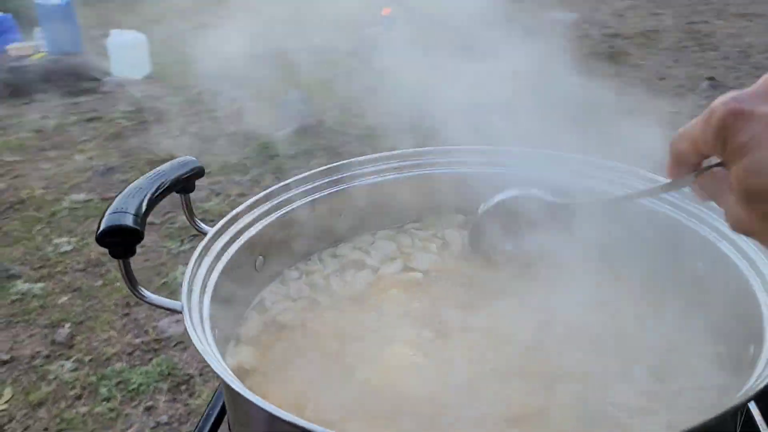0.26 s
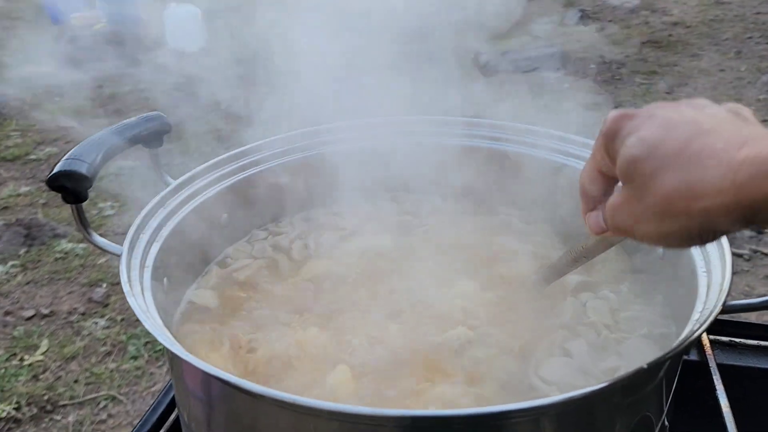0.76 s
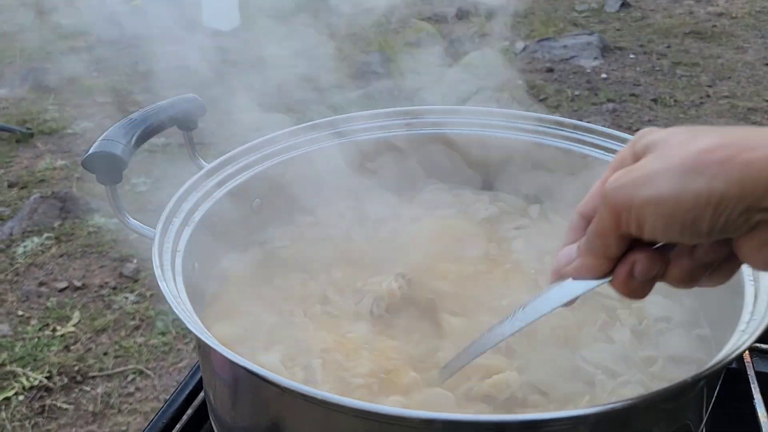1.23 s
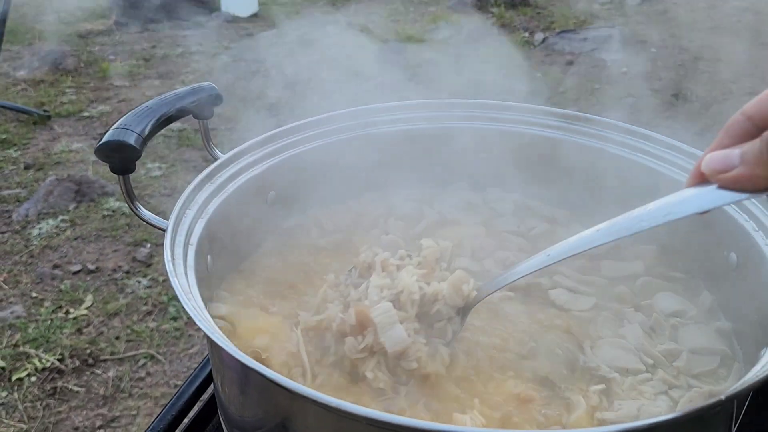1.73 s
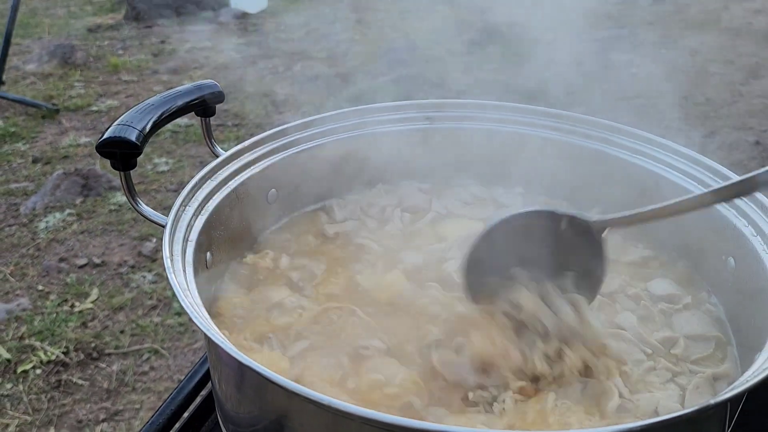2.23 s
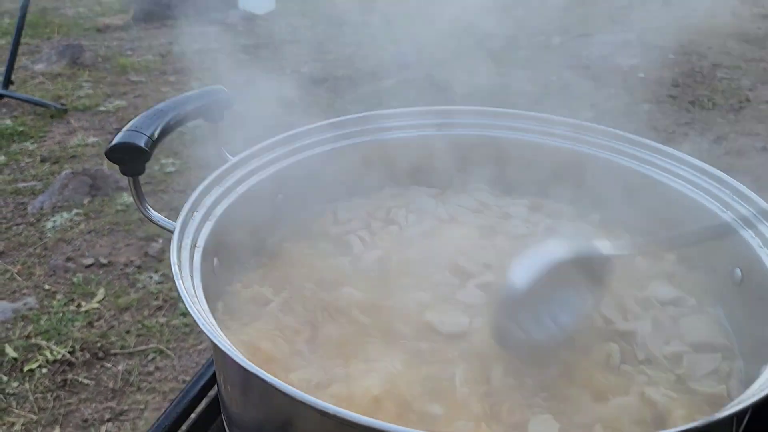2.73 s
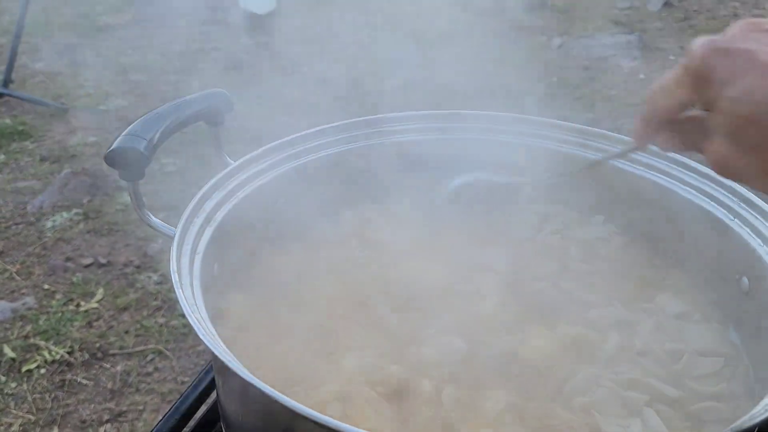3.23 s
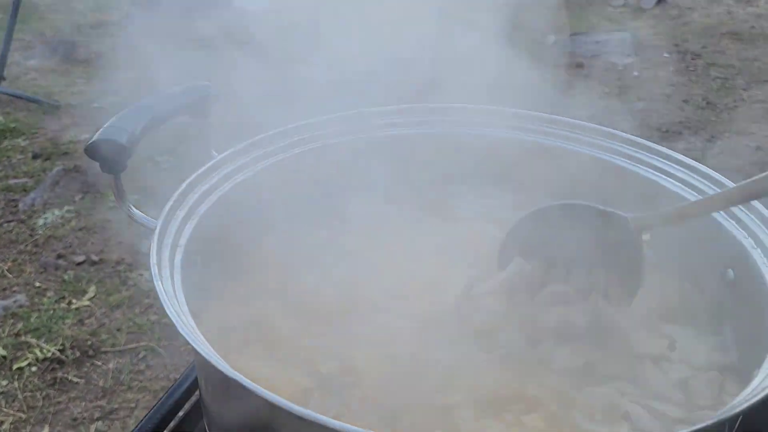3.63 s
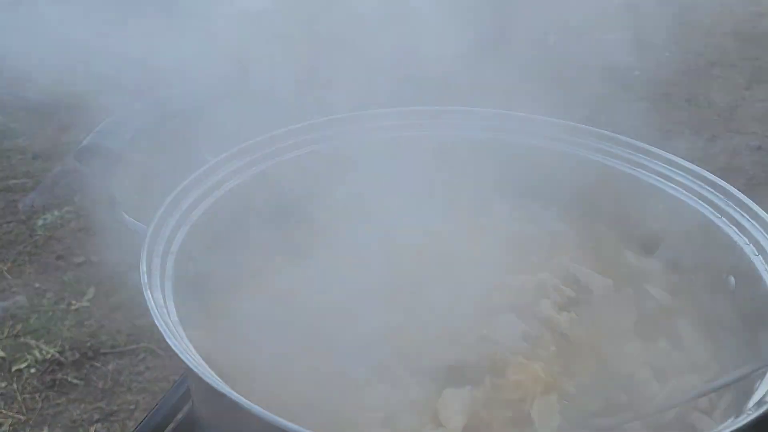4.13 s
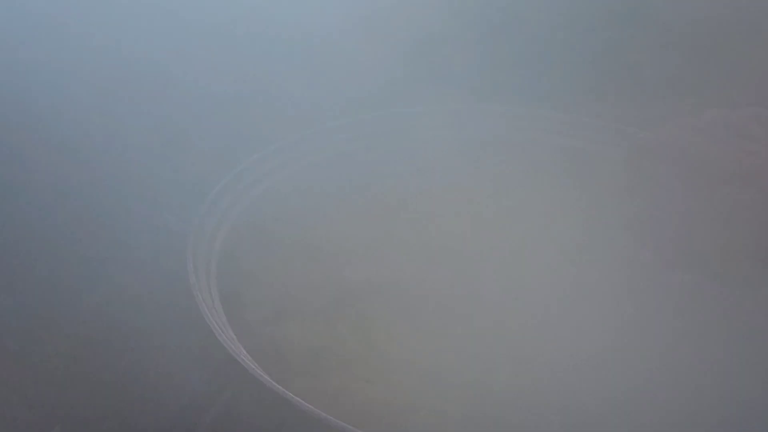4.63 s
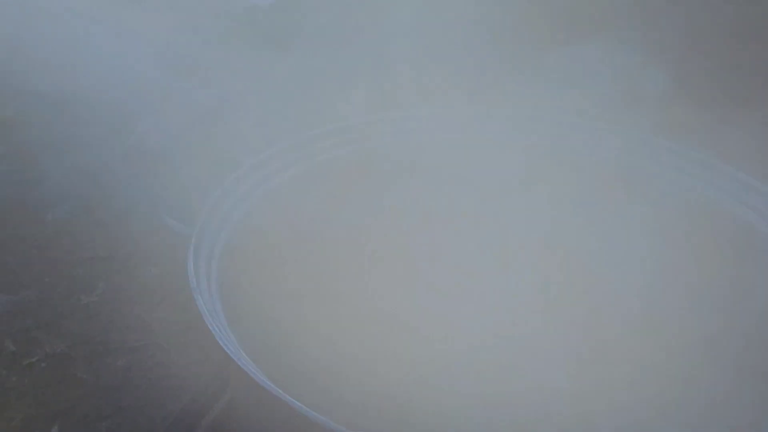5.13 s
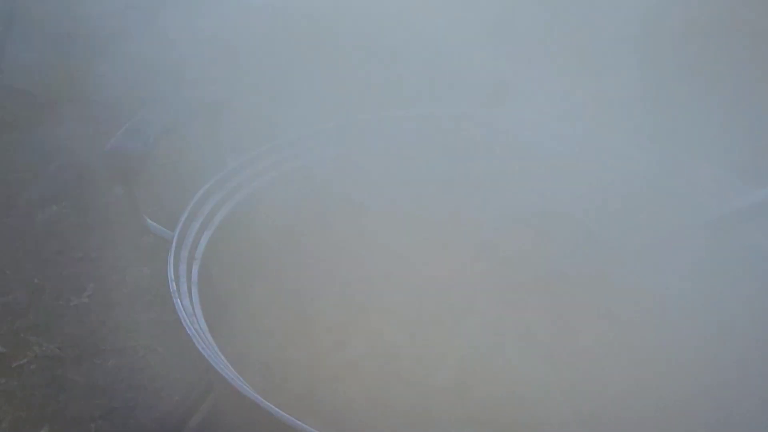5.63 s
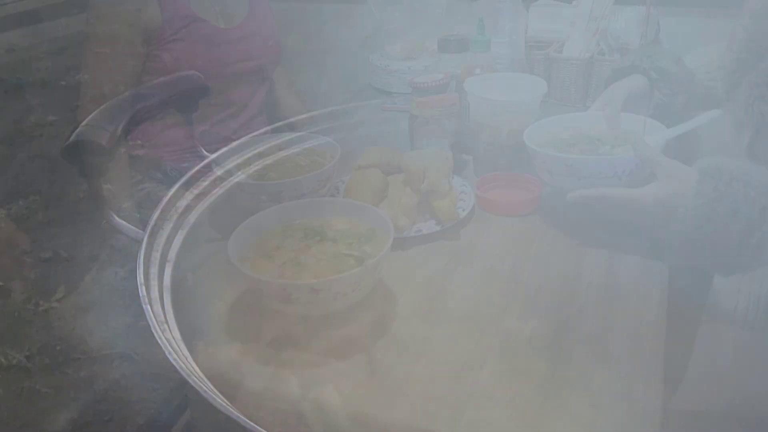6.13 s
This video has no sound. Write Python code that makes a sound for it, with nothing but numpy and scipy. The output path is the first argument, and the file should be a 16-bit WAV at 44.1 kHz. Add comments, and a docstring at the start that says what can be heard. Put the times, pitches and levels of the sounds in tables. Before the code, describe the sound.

A gas burner roars low and throbs unevenly under a gurgling, hissing pot of soup, with small wet plops and a few sharp metallic ticks.

```python
"""A gas burner roars under a big pot of soup at a campsite, close to a hand-held microphone.
Filtered noise makes the roar, its resonances and the hiss; a wavering sine makes the flame throb under the pot.
Rising, dying sines make the boil's gurgle and simmer and a ladle's plops; short puffs of noise make the spits.
A few sharp ticks, alone or close together, ring the pot. At the end the microphone turns away."""
import sys
import numpy as np
from scipy import signal
from scipy.fft import rfft, irfft, next_fast_len
from scipy.io import wavfile
from scipy.ndimage import uniform_filter1d

SR = 44100
rng = np.random.default_rng(int(sys.argv[2]) if len(sys.argv) > 2 else 0)


def wrap_up_sound(samples):
    """Save the sound to the file named by the first command line argument, as 16-bit audio."""
    columns = np.atleast_2d(samples).T
    # keep every value between -1 and 1, then stretch to whole-number steps
    tamed = np.clip(columns, -1, 1)
    steps = np.round(tamed * 32767).astype(np.int16)
    wavfile.write(sys.argv[1], SR, steps)


N = 280467  # length in samples


def undb(db):
    """Decibels to gain."""
    return 10 ** (np.asarray(db) / 20)


def unit(x):
    """Scale to rms 1."""
    return x / np.sqrt(np.mean(x ** 2))


def curve(table):
    """The level of a timed table, joined by straight lines, one value a sample."""
    start_s, level_db = np.transpose(table)
    return np.interp(np.arange(N) / SR, start_s, level_db)


def colour(x, points):
    """Filter by a spectrum of (Hz, dB) points, joined along log frequency."""
    hz, db = np.transpose(points)
    size = next_fast_len(N, True)
    f = np.maximum(np.fft.rfftfreq(size, 1 / SR), 1)
    gain = undb(np.interp(np.log(f), np.log(hz), db))
    return irfft(rfft(x, size) * gain, size)[..., :N]


def resonate(x, hz, width_hz):
    """A resonance with steep skirts, gain 1 at its centre: the same peak filter twice."""
    peak = np.concatenate(signal.iirpeak(hz, hz / width_hz / np.sqrt(2), fs=SR))
    return signal.sosfilt(np.tile(peak, (2, 1)), x)


def walk(rate_hz):
    """Slow chance: random levels, smoothed, with rms 1."""
    hold = int(SR / rate_hz)
    held = np.repeat(rng.standard_normal(N // hold + 1), hold)
    return unit(uniform_filter1d(uniform_filter1d(held, hold), hold)[:N])


def pan(x, left_minus_right_db):
    """Place a sound by its left minus right level."""
    sides_db = np.array([left_minus_right_db, -left_minus_right_db]).reshape(2, -1) / 2
    return x * undb(sides_db)


def add(out, start_s, sound):
    """Mix a short sound in at its start time."""
    i = int(start_s * SR)
    out[:, i:i + sound.shape[1]] += sound[:, :N - i]


def bubble(hz, cycles, glide):
    """A bubble rises in pitch as it surfaces, by the share glide, while it dies by 60 dB."""
    length_s = cycles / hz
    age = np.arange(int(length_s * SR)) / (length_s * SR)
    tone = np.sin(2 * np.pi * cycles * age * (1 + glide * age / 2))
    return tone * np.exp(-np.log(1000) * age)


# broad spectrum of the burning gas, relative: frequency_hz, level_db (per Hz)
ROAR_SPECTRUM = [(20, -17), (35, -8), (55, 5), (80, 2.5), (115, -1.5), (165, 2), (220, 2), (310, -0.5),
                 (380, -9.5), (540, -12.5), (640, -25), (1150, -37.5), (2200, -26.5), (2800, -47),
                 (8000, -63.5)]
# spread of the broad roar between the ears: frequency_hz, side_minus_mid_db
ROAR_WIDTH = [(30, -29), (80, -19.5), (250, -23.5), (480, -13.5), (630, 4.5), (780, 1.5), (1200, 10.5),
              (2200, -5), (8000, 9)]
# resonances of the air round the burner and in the pot: frequency_hz, width_hz, gain_db, left_minus_right_db
AIR_CAVITIES = [(432.3, 64, -7, -6), (529.7, 42.5, -10.5, -6.5), (647, 36, -26.5, 9), (731, 97, -14.5, 2),
                (960, 127, -23.5, 5), (1104, 104, -31.5, 17.5), (1454, 170, -16, -4), (1727, 190, -25, 3)]


def roar(flutter_db=0.69, flutter_hz=32, cavity_spread=0.066, churn_db=1.5, churn_hz=70):
    """Turbulent burning gas, fluttering, rings the air under and in the pot; each resonance churns on its own."""
    mid, side = rng.standard_normal((2, N))
    broad = mid + colour(side, ROAR_WIDTH) * np.array([[1], [-1]])
    out = colour(broad, ROAR_SPECTRUM)
    for hz, width_hz, gain_db, pan_db in AIR_CAVITIES:
        # almost the same noise at both ears
        eddies = rng.standard_normal(N) + cavity_spread * rng.standard_normal((2, N))
        eddies = eddies * unit(undb(churn_db * walk(churn_hz)))
        out += pan(resonate(eddies, hz, width_hz), pan_db) * undb(gain_db)
    return unit(out) * undb(flutter_db * walk(flutter_hz))


def throb(hz=76.8, wander_hz=6.94, wander_rate_hz=35, shake_db=1.5, shake_rate_hz=30):
    """The flame pulses with the air trapped under the pot, never quite in step."""
    phase = 2 * np.pi * np.cumsum(hz + wander_hz * walk(wander_rate_hz)) / SR
    return unit(np.sin(phase) * undb(shake_db * walk(shake_rate_hz)))


# the flame surges into a short boom: peak_s (at its height), length_s, level_db (added to the rest as power)
FLAME_SURGES = [(0.035, 0.069, -24), (0.162, 0.034, -29.5), (0.214, 0.036, -25.5), (0.835, 0.045, -23.5),
                (0.99, 0.024, -27.5), (1.116, 0.045, -27), (1.201, .045, -28), (1.28, 0.073, -22),
                (1.577, 0.03, -30), (1.905, 0.041, -27), (2.295, 0.076, -26), (2.36, 0.034, -27.5),
                (2.632, 0.042, -26.5), (2.696, .04, -29), (3.102, 0.036, -27.5), (3.24, 0.036, -29),
                (3.298, 0.045, -24.5), (3.52, 0.032, -30), (3.62, 0.087, -24), (4.012, 0.043, -24.5),
                (4.08, 0.051, -31), (4.256, .04, -29.5), (4.36, 0.054, -25), (4.734, 0.066, -28),
                (4.9, 0.076, -27), (4.986, 0.032, -28), (5.403, 0.024, -26.5), (5.59, 0.028, -28.5),
                (5.696, 0.042, -26.5), (5.82, 0.053, -26.5)]


def surging(rest_db=-36.5, unrest_db=2.8, unrest_hz=34):
    """Strength of the throb: it wavers by chance, and each surge swells and dies as a smooth bell."""
    t = np.arange(N) / SR
    boom_power = np.zeros(N)
    for peak_s, length_s, level_db in FLAME_SURGES:
        boom_power += undb(level_db) ** 2 * np.exp(-np.pi * ((t - peak_s) / length_s) ** 2)
    rest = undb(rest_db + unrest_db * walk(unrest_hz))
    return np.sqrt(rest ** 2 + boom_power)


# spectrum of the hiss of gas and steam, relative: frequency_hz, level_db (per Hz)
HISS_SPECTRUM = [(1000, -1), (2000, -4), (3100, 6.5), (3600, 0.5), (4250, 4), (4900, 2), (6400, -0.5),
                 (7300, 0), (8100, -5), (9300, -4), (10000, -6.5), (11400, -3), (12500, -8), (14500, -8),
                 (15800, -25)]
# the hiss leans to the right: frequency_hz, left_minus_right_db
HISS_LEAN = [(2500, -11), (3100, -3.5), (3600, -4), (5000, -4.5), (7300, -8), (8100, -3), (11400, -3),
             (14000, -0.5)]


def fizz(bursts_per_s=2600, scatter_db=3.0, grain_db=-5, flicker_db=1.2, flicker_hz=110):
    """Gas hiss with a quick sizzle, and the bursting of countless tiny bubbles."""
    chance = rng.random(N)
    size = np.minimum(rng.exponential(size=N), 2 * np.pi)
    bursts = (chance < bursts_per_s / SR) * undb(scatter_db * size) * rng.standard_normal((2, N))
    steam = rng.standard_normal((2, N)) + undb(grain_db) * unit(bursts)
    left, right = colour(steam * undb(flicker_db * walk(flicker_hz)), HISS_SPECTRUM)
    left = colour(left, [(hz, db / 2) for hz, db in HISS_LEAN])
    right = colour(right, [(hz, -db / 2) for hz, db in HISS_LEAN])
    return unit(np.array([left, right]))


def bubbling(count, low_hz, high_hz, cycles, scatter_db, width_db):
    """Bubbles of many sizes break at random all over the soup."""
    out = np.zeros((2, N))
    for when, pitch, size, place in rng.random((count, 4)):
        ring = bubble(low_hz * (high_hz / low_hz) ** pitch, cycles, glide=0.13)
        swell = 1 - np.exp(-np.arange(len(ring)) * cycles / len(ring))  # softens the onset
        gain = undb(-scatter_db * np.log(max(size, .02)))
        add(out, when * (N - 1) / SR, pan(ring * swell * gain, width_db * (place - .5)))
    return unit(out)


# plops of the ladle and of big bubbles:
# start_s, level_db (peak without the splash), pitch_hz (at the start), t60_s
SOUP_PLOPS = [(.132, -30.5, 680, 0.029), (0.237, -34, 1320, 0.03), (.467, -34, 796, 0.014),
              (.876, -35.5, 1600, .02), (0.935, -41, 784, .02), (0.937, -33.5, 1600, 0.054),
              (1.311, -37, 1020, 0.012), (1.496, -35.5, 1450, 0.024), (1.598, -37, 1440, .02),
              (1.66, -35, 1470, 0.023), (2.479, -35, 1310, .018), (3.055, -30, 930, 0.019),
              (3.0555, -39, 1600, .018), (3.061, -31.5, 790, 0.023), (3.082, -38, 1440, .025),
              (3.224, -36.5, 1455, 0.054), (3.474, -47, 1420, 0.016), (3.5787, -34, 960, 0.03),
              (3.656, -31, 1460, 0.016), (4.484, -35, 746, .02), (4.545, -28.5, 1050, 0.0086),
              (4.5457, -26, 378, 0.0087), (4.699, -36, 1580, 0.023), (4.734, -42, 1170, .025),
              (5.573, -38, 1190, .018), (5.627, -38, 780, .036), (5.647, -37, 890, 0.02),
              (5.7622, -35.5, 1340, .011), (5.763, -33, 810, 0.024)]


def plops(rise_s=0.00026, glide=0.21, splash_db=-10, splash_width=0.95, spread=1.0):
    """A pocket of air closes in the soup: a rising blip with a little wet splash round its pitch."""
    out = np.zeros((2, N))
    for start_s, level_db, hz, t60_s in SOUP_PLOPS:
        blip = bubble(hz, hz * t60_s, glide)
        t = np.arange(len(blip)) / SR
        drops = rng.standard_normal(SR // 10) + spread * rng.standard_normal((2, SR // 10))
        spray = unit(resonate(drops, hz, splash_width * hz))[:, :len(t)]
        spray = spray * np.exp(-np.log(1000) * t / t60_s)
        swell = 1 - np.exp(-t / rise_s)
        plop = (blip + undb(splash_db) * spray) * swell
        add(out, start_s, plop * undb(level_db) / abs(blip * swell).max())
    return out


# soup spits on the hot metal: start_s, length_s (twice the time to its height), level_db (at its height, before pan)
SOUP_SPITS = [(0.163, 0.035, -53.5), (0.476, 0.02, -49.5), (0.497, 0.018, -52.5), (2.156, 0.016, -53),
              (3.188, 0.004, -55), (3.203, 0.0049, -47), (3.245, .005, -47), (3.917, 0.0053, -45),
              (4.268, .008, -53), (4.346, .02, -52), (5.705, 0.0088, -49)]
# spectrum of a spit, relative: frequency_hz, level_db (per Hz)
SPIT_SPECTRUM = [(1500, -36), (4000, 3), (6000, 8.5), (8500, 1), (11500, -1), (15000, -14)]


def spits(count=110, stray_db=-60, stray_s=0.018, scatter_db=2, pan_db=-2):
    """Drops flash to steam in short hisses that swell and die; faint ones come at random."""
    t = np.arange(SR // 4) / SR
    power = np.zeros((1, N))
    strays = [(when * (N - 1) / SR, stray_s * (.5 + length), stray_db + scatter_db * (2 * level - 1))
              for when, length, level in rng.random((count, 3))]
    for start_s, length_s, level_db in SOUP_SPITS + strays:
        age = 2 * t[None] / length_s
        add(power, start_s, (undb(level_db) * age * np.exp(1 - age)) ** 2)
    hiss = unit(colour(rng.standard_normal((2, N)), SPIT_SPECTRUM))
    return pan(hiss, pan_db) * np.sqrt(power)


# sharp ticks at the pot: start_s, level_db (dry peak before pan), left_minus_right_db,
# body_db (below the snap), treble_db (above it), snap_db (dry blow against the ring),
# tilt_db (of the ring, per octave), pitch_ratio (of the ring)
POT_TICKS = [(0.4681, -27.5, -12, -1, -19, -22, 13, .99), (0.467, -28, -4, -4, -8, -22, -14, 1.03),
             (1.0708, -39, -2, -10, -12, -8, 8, 1.2), (2.7868, -27.5, -9, 0, -22, -9, 6, 0.94),
             (3.2534, -26, -15, 3, -22, -12, -6, 1.15), (3.2552, -26, -10, 2, -9, -22, -6, 1.01),
             (4.5554, -26.5, -6, -2, -24, -10, -14, 1), (4.5568, -33, -4, -8, -22, -8, -9, 1),
             (4.562, -20.5, -1, 4, -26, -2, 0, 1), (4.5631, -15, -12.5, -23, -15.5, 5, 6, 0.95),
             (4.5683, -34, -6, -16, -22, -2, -2, 1), (4.5736, -36, -4, -14, -22, -4, 2, 1.1)]
# what a tick rings with at pitch ratio 1, damped by the soup: frequency_hz, gain_db (before tilt), t60_s
RING_MODES = [(1455, -1, 0.024), (2070, -7, 0.021), (3140, 2.5, 0.013), (3700, -6, .009),
              (4100, -0.5, 0.011), (4760, 0, 0.012), (5480, 0.5, 0.013), (6300, 1.5, 0.011),
              (7250, -2.5, 0.0072), (8350, -3, .008), (11600, 2.5, 0.0081), (13700, -5, .005)]


def ticks(body_low_hz=1050, snap_low_hz=2600, snap_high_hz=7100, edge_low_hz=8000, edge_high_hz=14500,
          scatter=0.022, scatter_s=0.012):
    """Metal meets metal in a hard snap; the damped modes ring on and scatter faintly between the walls of the pot."""
    out = np.zeros((2, N))
    t = np.arange(SR // 20) / SR
    contact = 1. * (t == 0)

    def band(low_hz, high_hz):
        """The contact click held to one band."""
        return signal.sosfilt(signal.butter(6, [low_hz, high_hz], "band", fs=SR, output="sos"), contact)

    body = band(body_low_hz, snap_low_hz)
    snap = band(snap_low_hz, snap_high_hz)
    edge = band(edge_low_hz, edge_high_hz)
    tilt_centre_hz = np.sqrt(snap_low_hz * snap_high_hz)
    for start_s, level_db, pan_db, body_db, treble_db, snap_db, tilt_db, pitch_ratio in POT_TICKS:
        blow = undb(body_db) * body + snap + undb(treble_db) * edge
        tick = undb(snap_db) * blow
        for hz, gain_db, t60_s in RING_MODES:
            mode = signal.iirpeak(hz * pitch_ratio, np.pi * hz * t60_s / np.log(1000), fs=SR)
            octaves = np.log2(np.clip(hz, snap_low_hz, snap_high_hz) / tilt_centre_hz)
            tick = tick + signal.lfilter(*mode, blow) * undb(gain_db + tilt_db * octaves)
        tick = tick / abs(tick).max()
        walls = contact + scatter * rng.standard_normal((2, len(t))) * np.exp(-t / scatter_s)
        scattered = signal.fftconvolve(walls, tick[None], axes=1)
        add(out, start_s, pan(scattered, pan_db) * undb(level_db))
    return out


def turned_away(loss_db, turn_s=5.95, turn_length_s=0.27):
    """Gain that sinks by loss_db as the microphone swings away from the pot."""
    turned = np.clip((np.arange(N) / SR - turn_s) / turn_length_s, 0, 1)
    return undb(-loss_db * turned)


# level of the flame's roar, before the roar_db trim: start_s, level_db
FLAME_LEVEL = [(0, -29.5), (1.0, -28.5), (1.4, -30), (2.1, -28.5), (3.6, -29), (4.1, -30), (5.35, -29),
               (5.9, -30.5)]
# hiss of gas and steam, before the fizz_db trim: start_s, level_db
STEAM_LEVEL = [(0, -62), (1.0, -62), (1.4, -64), (2.3, -62.5), (3.8, -61), (4.5, -63), (5.35, -62),
               (5.55, -63.5), (5.9, -62)]
# how hard the stirred soup simmers, before the bubbling_db trim: start_s, level_db
BOIL_LEVEL = [(0, -40), (.55, -42), (.92, -40), (1.35, -50), (1.55, -44), (2.8, -46), (3.25, -45.5),
              (4.3, -41.5), (5.0, -48.5), (6.36, -70)]


def scene(bubbling_db=-10.0, fizz_db=10.0, roar_db=-0.52, gurgle_db=-41.0):
    """Burner, boil and ladle in the open air, with no room; turning away costs the hiss more than the roar."""
    gurgle = bubbling(count=260, low_hz=190, high_hz=541, cycles=22.5, scatter_db=0.9, width_db=5)
    simmer = bubbling(count=1500, low_hz=845, high_hz=2490, cycles=27, scatter_db=1.0, width_db=15)
    rumble = roar() * undb(curve(FLAME_LEVEL) + roar_db) + gurgle * undb(gurgle_db)
    pulse = throb() * surging()
    soup = simmer * undb(curve(BOIL_LEVEL) + bubbling_db)
    soup = soup + fizz() * undb(curve(STEAM_LEVEL) + fizz_db) + spits()
    # the throb, plops and ticks keep their level through the turn
    return rumble * turned_away(loss_db=2.0) + pulse + soup * turned_away(loss_db=5.5) + plops() + ticks()


def record(dry, bottom_hz=18, top_hz=15500):
    """The microphone drops the deepest rumble and the top."""
    dry = signal.sosfilt(signal.butter(2, bottom_hz, "high", fs=SR, output="sos"), dry)
    return signal.sosfilt(signal.ellip(8, .2, 70, top_hz, fs=SR, output="sos"), dry)


dry = scene()
out = record(dry)
wrap_up_sound(out)
```